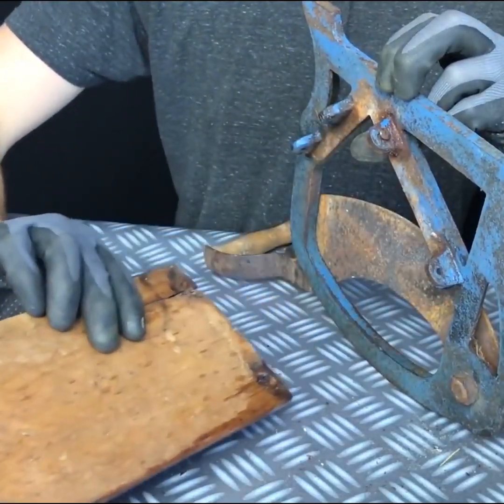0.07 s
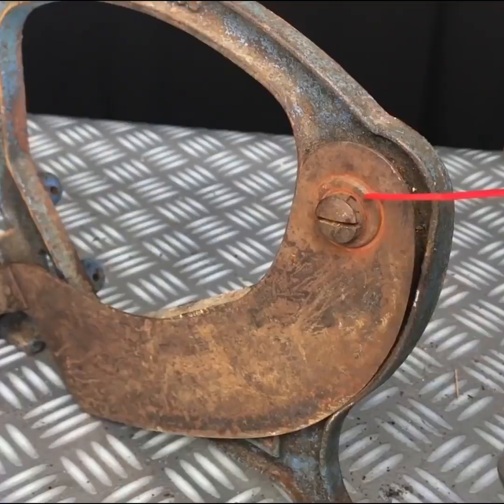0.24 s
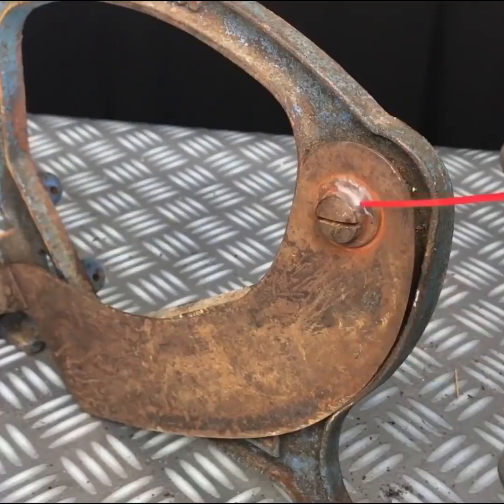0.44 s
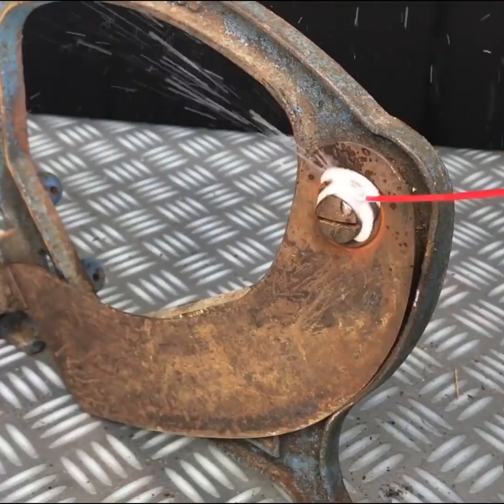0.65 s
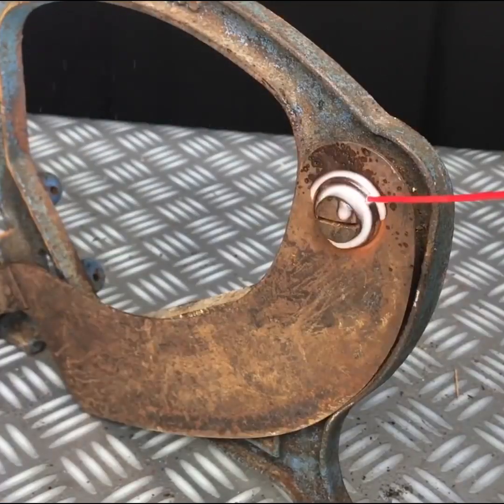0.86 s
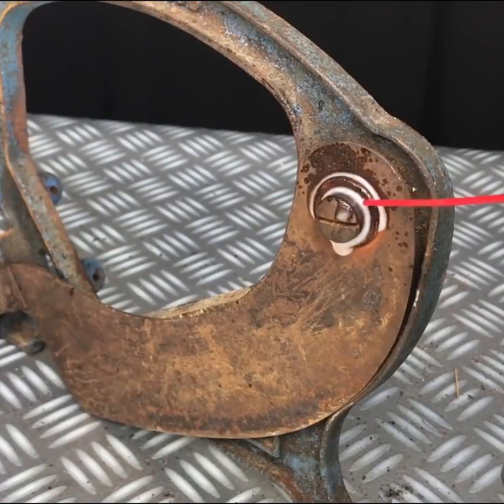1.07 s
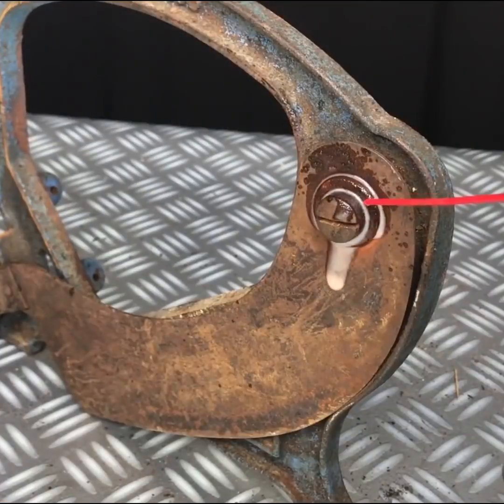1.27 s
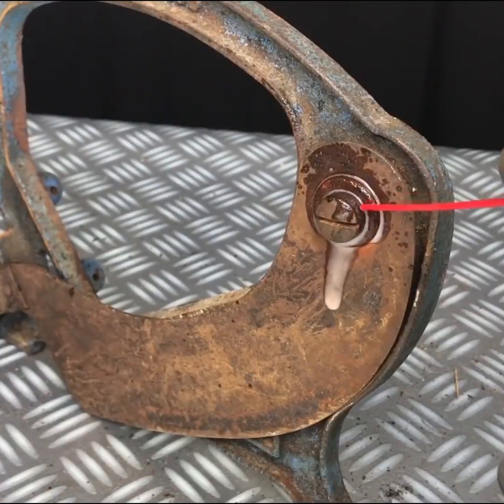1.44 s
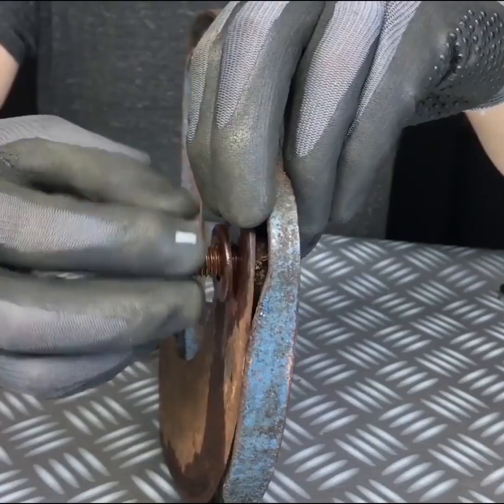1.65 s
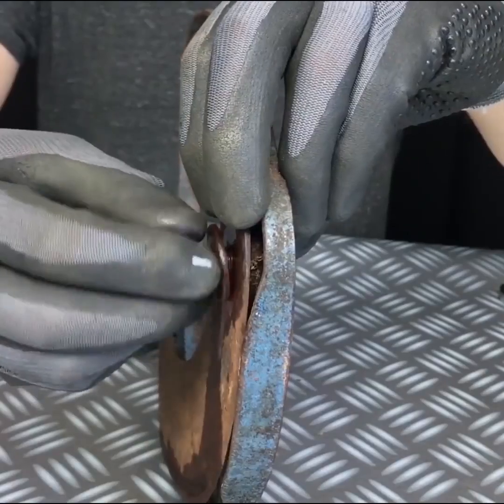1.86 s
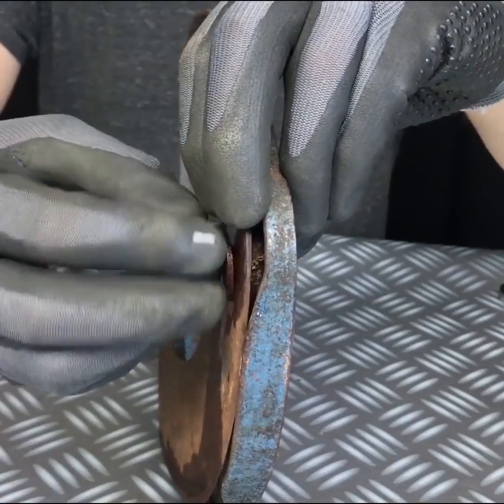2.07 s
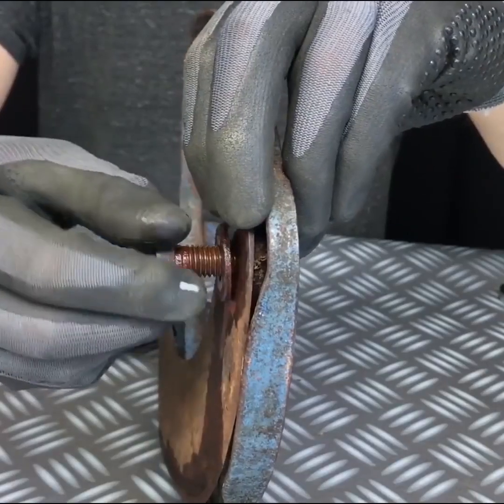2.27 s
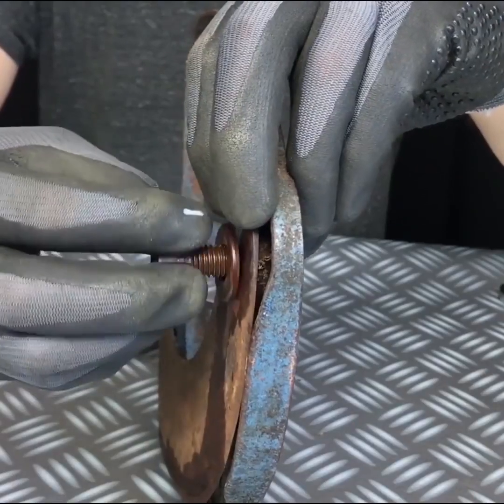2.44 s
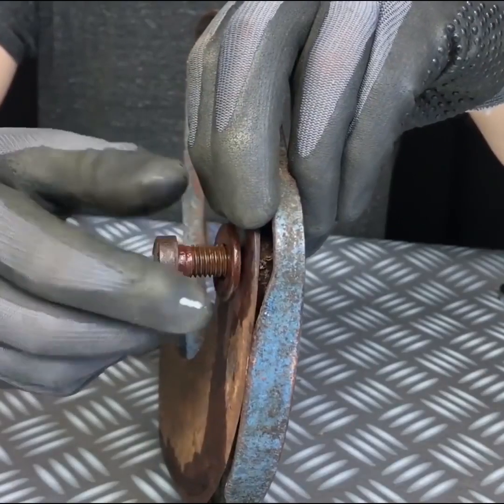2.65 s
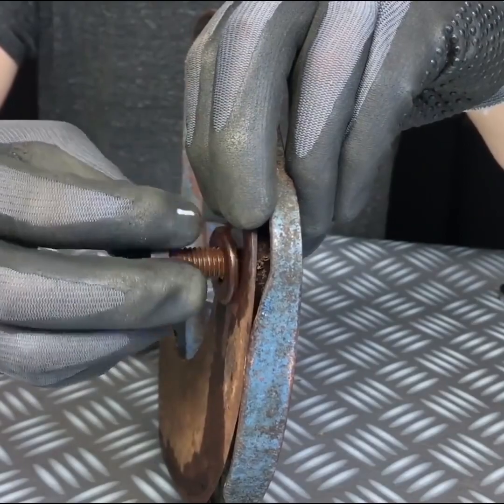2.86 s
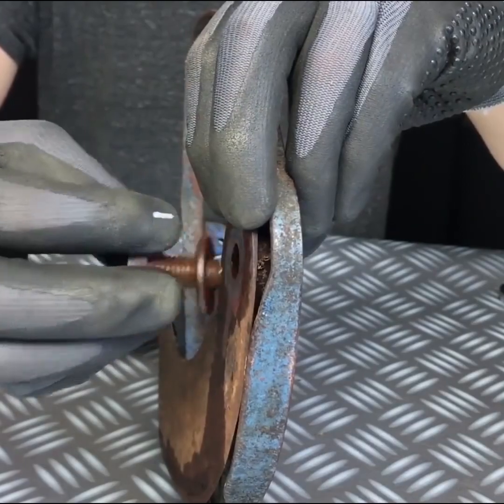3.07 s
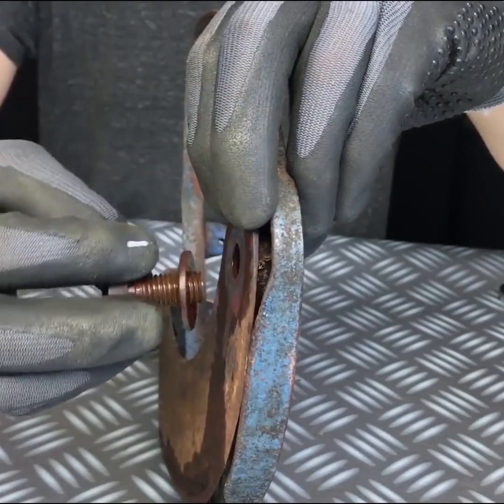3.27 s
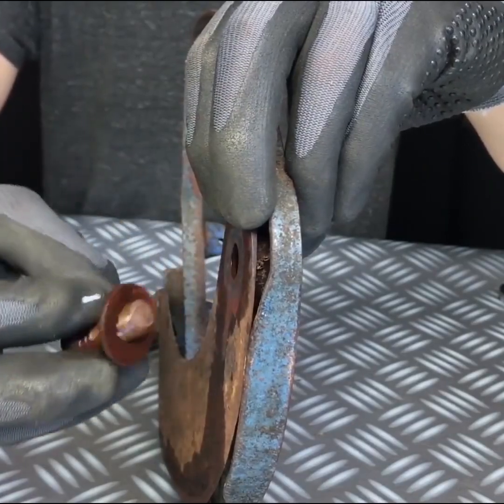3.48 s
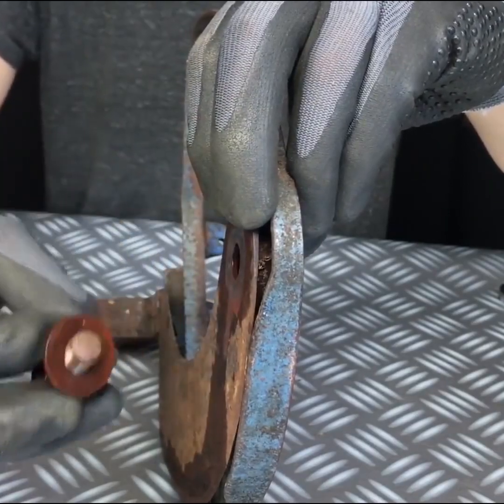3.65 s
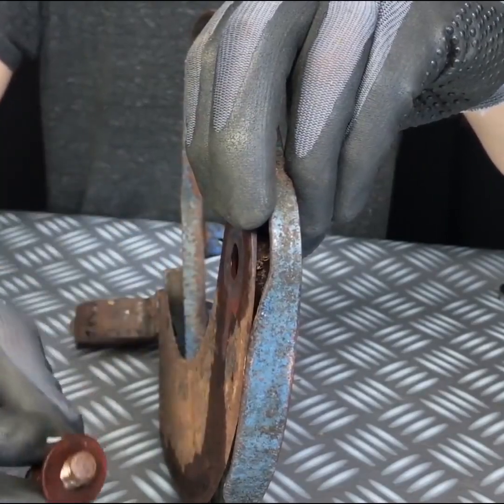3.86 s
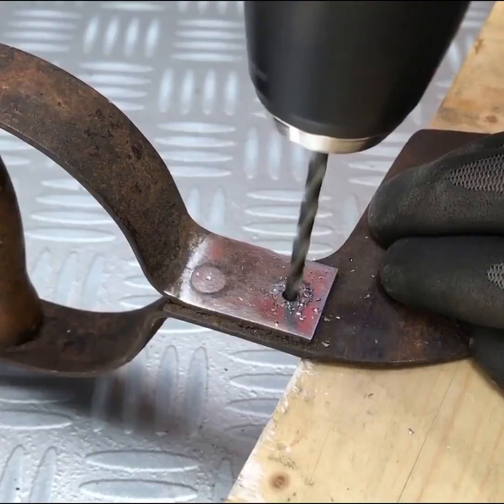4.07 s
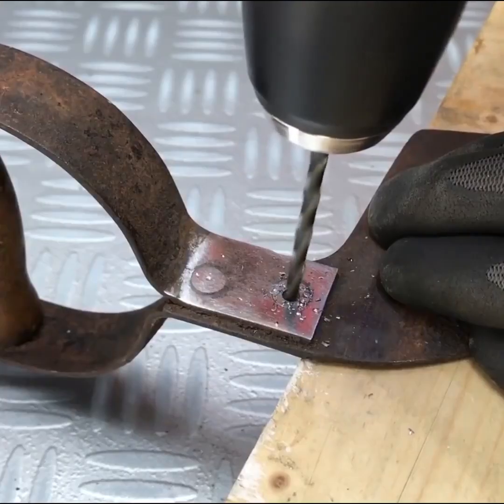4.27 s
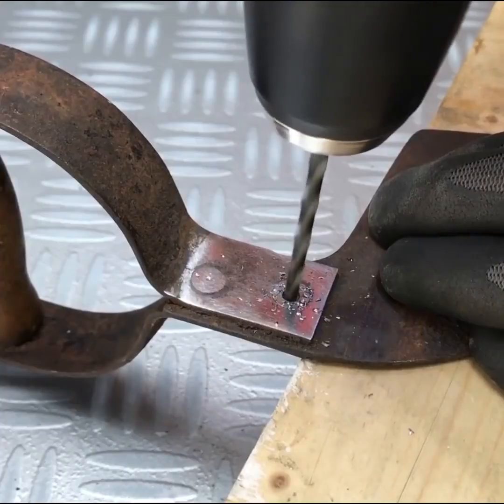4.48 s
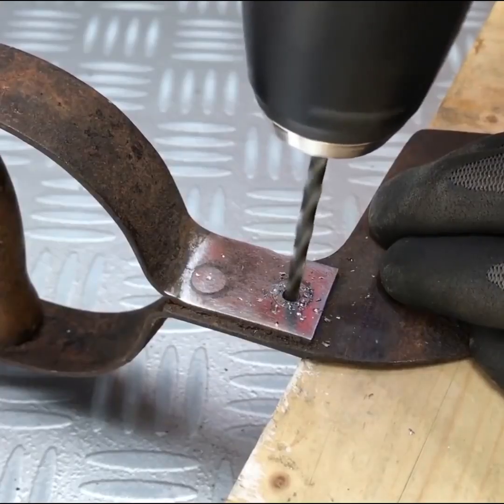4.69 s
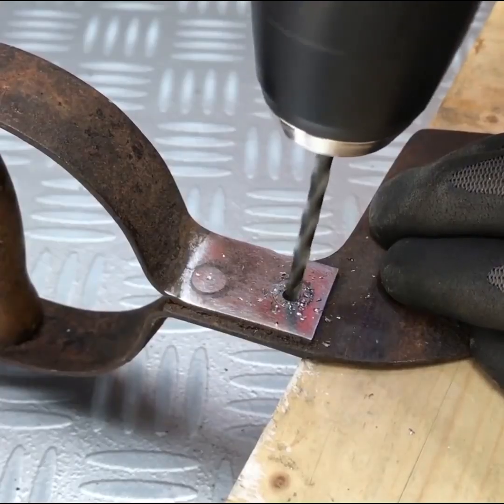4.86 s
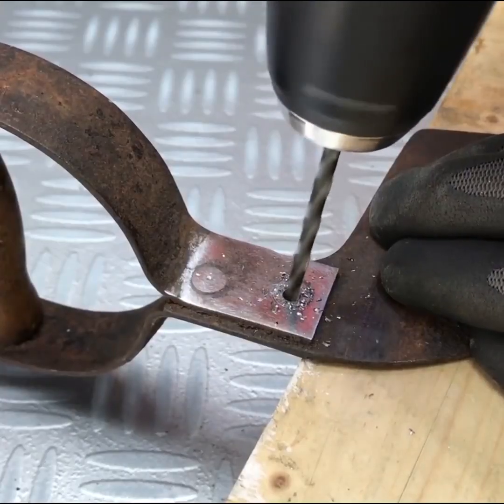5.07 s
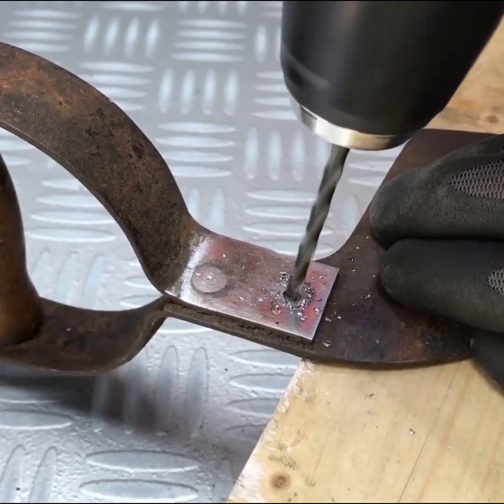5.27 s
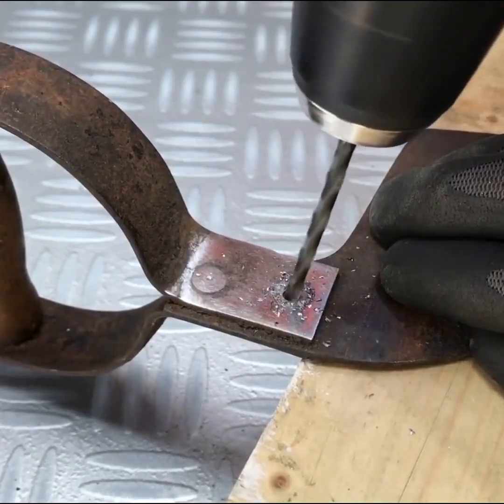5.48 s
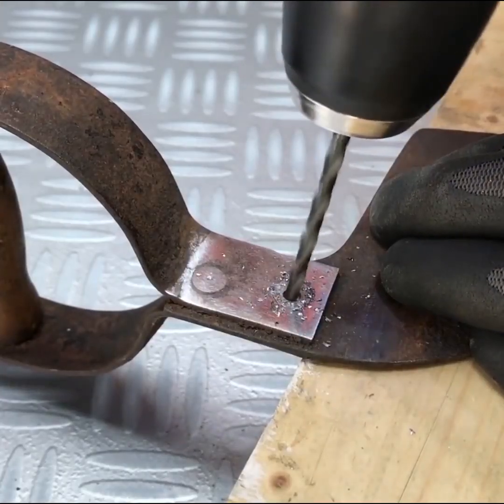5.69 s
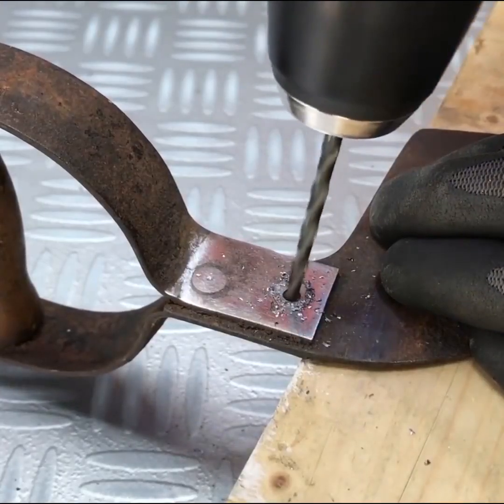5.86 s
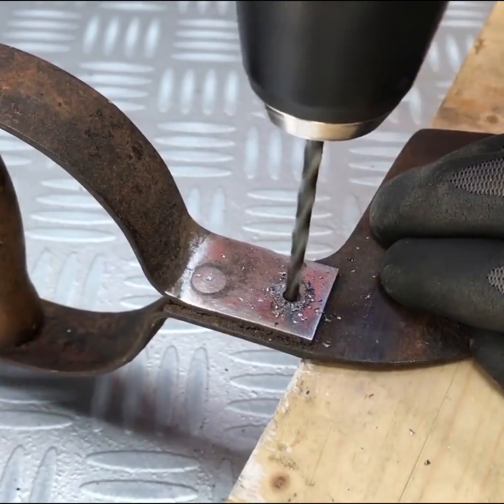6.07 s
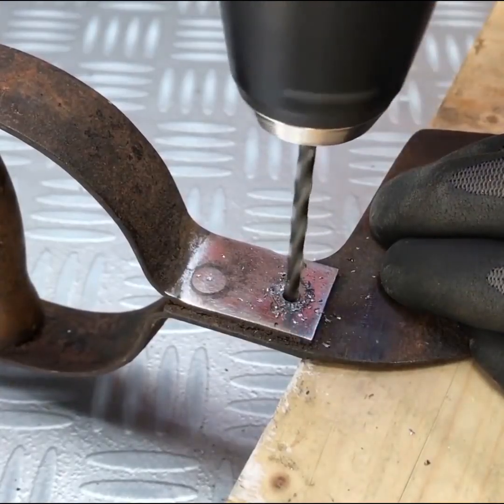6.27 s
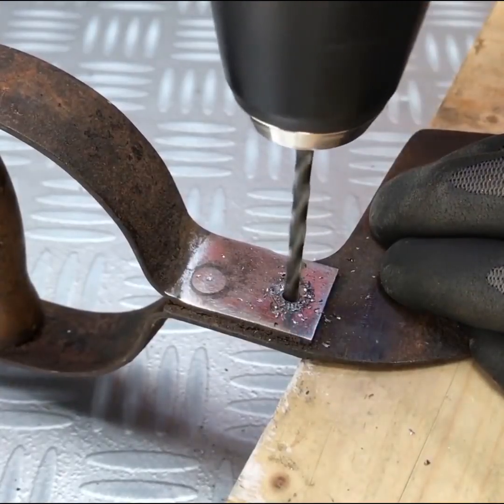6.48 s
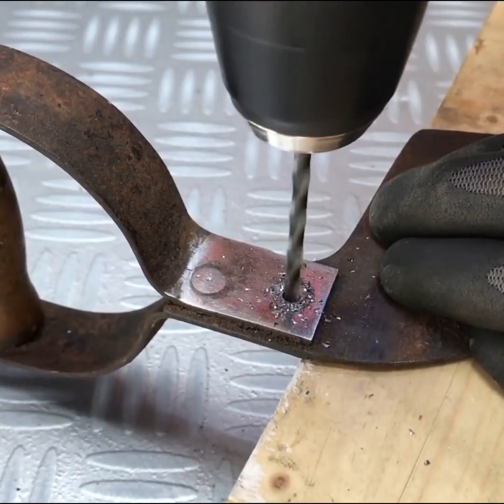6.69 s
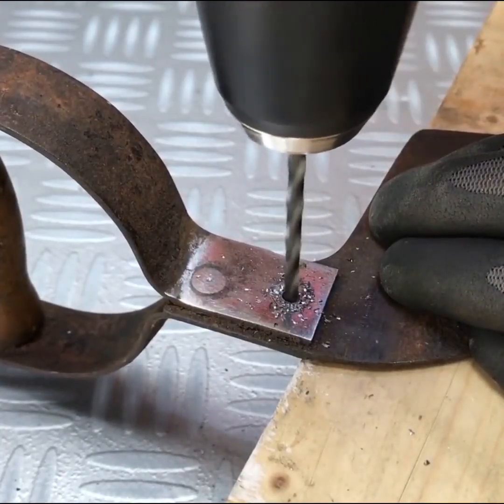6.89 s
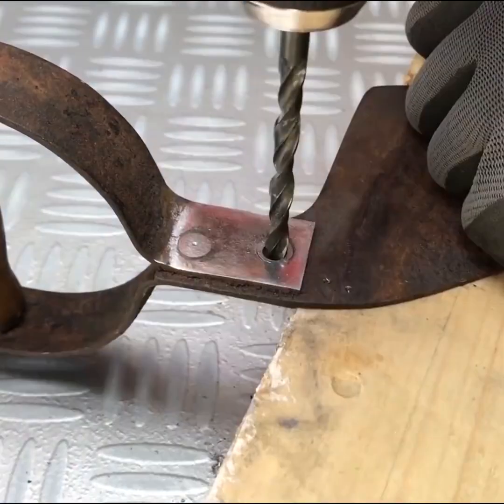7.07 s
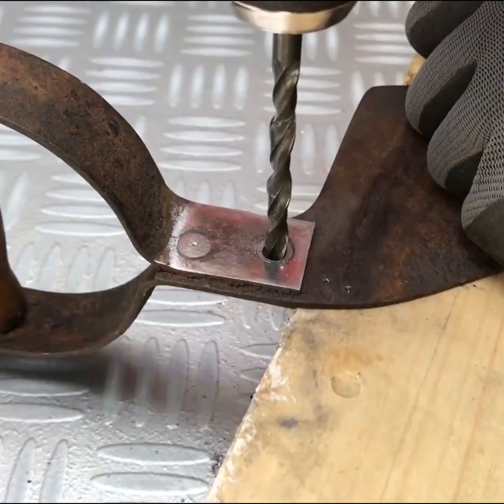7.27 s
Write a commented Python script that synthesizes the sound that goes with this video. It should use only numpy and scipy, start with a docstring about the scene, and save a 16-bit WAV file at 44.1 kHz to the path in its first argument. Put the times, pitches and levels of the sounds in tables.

```python
"""A tread-plate bench in a workshop, close up: work on a rusty iron tool, alike in both channels.
An aerosol can spits penetrating oil (combed droplet noise); gloved fingers twist a loose screw out
(shaped noise for thuds and grating, damped modes for the clinks in its hole).
A cordless drill bores the steel: tones locked to the motor, hiss, judder, squeaks and bench rumble;
it is cut in and out abruptly. Glove scuffs follow, over a quiet room tone."""
import sys
import numpy as np
from scipy import signal
from scipy.fft import rfft, irfft, next_fast_len
from scipy.io import wavfile
from scipy.ndimage import map_coordinates

SR = 44100
rng = np.random.default_rng(int(sys.argv[2]) if len(sys.argv) > 2 else 0)


def materialize(psi):
    """Save the field psi as 16-bit PCM at rate SR to the path in sys.argv[1].

    A 1-D psi becomes a single channel; in a 2-D psi each row is a channel.
    """
    bounded = np.clip(np.atleast_2d(psi).T, -1, 1)
    quanta = np.round(bounded * 32767).astype(np.int16)
    wavfile.write(sys.argv[1], SR, quanta)


N = 323253

# "Relative" levels get a further trim in the source's function.
# Colours of noise. Each row: frequency in Hz, relative density in dB per Hz.
ROOM_TONE_COLOUR = [(15, -33.5), (25, -13.5), (59, -0.5), (116, -15.5), (152, -6.5), (199, -10.5),
                    (221, -13.5), (341, -16.5), (379, -22), (539, -22.5), (1110, -26.5), (1240, -28),
                    (7340, -36), (15600, -36)]
JET_COLOUR = [(300, -29), (550, -24.5), (800, -20.5), (1250, -14), (1850, -12.5), (2600, -5.5), (4500, -10),
              (5500, -9.5), (6100, -2.5), (6800, -5.5), (9000, -4), (12800, -6.5), (14800, -2), (15700, -4)]
THUD_COLOUR = [(15, -43), (25, -14.5), (86, 6.5), (124, -0.5), (156, -7), (193, -1), (263, -19.5),
               (352, -2.5), (400, -15.5), (520, -38), (880, -120)]
KNOCK_COLOUR = [(150, -43), (250, -11), (316, -7), (352, 1.5), (386, -4.5), (615, -11), (670, -7),
                (747, -17), (814, -13), (1190, -30), (1500, -20), (1600, -21), (2080, -47.5), (3520, -120)]
SCRAPE_COLOUR = [(530, -32), (900, -7), (2000, -8.5), (2200, -4.5), (2540, -6.5), (2790, -6), (3630, -8.5),
                 (3990, -7), (4390, -10.5), (4770, -11), (15500, -23.5)]
CRACK_COLOUR = [(290, -44), (500, -19.5), (1880, -17), (3010, -13.5), (3850, -6.5), (4980, -6),
                (6640, -7.5), (9110, -10.5), (11100, -10.5), (12900, -14.5), (14400, -10.5), (15500, -25)]
WHIRR_COLOUR = [(300, -28), (600, -7.5), (1200, -0.5), (2300, 0.5), (3000, -0.5), (3500, 1.5), (3900, -3.5),
                (4800, -0.5), (6100, -0.5), (6900, -2.5), (8300, -5.5), (11000, -3.5), (13700, -2),
                (15600, -4.5)]
SHAKE_COLOUR = [(15, -40), (25, -16.5), (59, 5.5), (118, 2.5), (271, -3.5), (303, -9), (395, -14),
                (530, -22.5), (600, -28.5), (700, -19.5), (910, -60), (1540, -120)]

# Room tone. Each row: time in s, level in dB.
FLOOR = [(0, -66), (1.6, -68), (3.8, -67.5), (7.33, -70.5)]
# Soft drone that comes and goes. Each row: start in s, end in s, level in dB.
DRONE = [(.25, 1.75, -67), (7.0, 7.6, -70)]
# Room tail. Each row: frequency in Hz, t60 in s.
ROOM_T60 = [(200, .35), (2000, .36), (7000, 0.26), (15000, 0.2)]
TOP_HZ = 15780

# Glove shifting on the workpiece. Each row: peak in s, centre in Hz, width in Hz, level in dB, half length in s.
SCUFFS = [(7.106, 9000, 14000, -67.5, 0.0096), (7.142, 5940, 5900, -70, 0.013),
          (7.163, 1700, 500, -71, 0.016), (7.207, 3000, 6000, -69, 0.005), (7.268, 5000, 7000, -76, 0.0052),
          (7.325, 2750, 200, -76, .012)]
# Oil jet. Each row: time in s, level in dB.
JET = [(0.535, -30), (0.543, -39), (0.551, -41), (0.619, -30.5), (0.885, -33), (0.915, -45.5)]

# Frame bumping the bench. Each row: start in s, relative level in dB.
BUMPS = [(1.639, -40), (1.91, -39.5), (2.056, -43), (2.342, -38), (2.504, -33), (2.715, -44), (2.938, -44),
         (3.05, -35.5), (7.287, -54)]
# Bench modes. Each row: frequency in Hz, level in dB, t60 in s.
BENCH_MODES = [(86.5, -10.5, 0.12), (136, -11, 0.086), (193, -11.5, 0.11), (355, -5, 0.16),
               (450, -3.5, 0.068), (560, -4, 0.062), (798, -13, 0.046)]
# Steel modes. Each row: frequency in Hz, level in dB (clinks only), t60 in s.
STEEL_MODES = [(1520, -26, .13), (2180, -24, .1), (2750, -14, .19), (3128, -15, .15), (3460, -16, .1),
               (3770, -8, .1), (4058, -6, .18), (4650, -7, .05), (5300, -7, .06), (5920, -7, .05),
               (6475, -4, .06), (6780, 2, .035), (7180, -3, .05), (7843, -5, .05), (9650, -8, .05),
               (10260, -9, .045), (11440, 1, .05)]
WASHER_HZ = 14060
# Screw and washer touching the frame. Each row: start in s, level in dB, relative washer ring in dB,
# relative frame ring in dB, low-pass cut-off of the contact in Hz.
CLINKS = [(1.6407, -40, -30, 0, 15000), (1.911, -45.5, -40, -10, 1000), (1.977, -33.5, -40, -2, 11000),
          (1.9985, -30, -32, -1, 14000), (2.0413, -38.5, -10, -4, 13000), (2.0558, -36.5, -2, -2, 15000),
          (2.344, -37, -40, -8, 2000), (2.4225, -27, -25, -7.5, 10000), (2.492, -41.5, -25, -8, 15000),
          (2.5717, -18.5, -9, -3, 18000), (2.714, -23, -16, -5.5, 14000), (2.8944, -34.5, -20, -9, 11000),
          (2.9707, -26.5, -26, -8, 10000), (3.049, -22, -40, 0, 2200), (3.0945, -21.5, -8, -5, 14000),
          (3.597, -54, 7, -10, 14000)]
# Crack t60 at the hard level; it doubles for each such drop in level.
CRACK_T60_S, HARD_DB, CRACK_DOUBLES_DB = .036, -22, 16

# Fingers twisting the screw. Each row: peak in s, time to rise 20 dB in s, relative bench thud in dB,
# relative frame knock in dB, relative thread scrape in dB.
TWISTS = [(1.652, .02, -48, -49, -54), (1.79, .06, -57, -58.5, -71), (2.055, .08, -43.5, -51.5, -55),
          (2.252, .06, -82, -88, -66), (2.348, .016, -51, -52, -71), (2.52, .11, -45.5, -49, -53),
          (2.59, .05, -55, -60, -75), (2.9, .03, -63, -63, -57.5), (2.955, .13, -47, -54.5, -55.5),
          (3.054, .05, -55, -50, -58), (3.17, .04, -60, -76, -61.5), (3.228, .05, -85, -90, -71)]
THUD_FALL_S, KNOCK_FALL_S, SCRAPE_FALL_S = .13, .1, .14  # time for 20 dB
SCRAPE_RISE_SHARE = .6  # the thread breaks loose late in the twist
GRIP_RELATIVE_DB = -73  # thudding of the gloves between twists

DRILL_ON_S, DRILL_OFF_S = 3.978, 7.102
# Motor speed. Each row: time in s, turns per second.
SPEED = [(3.98, 302.7), (4.42, 303), (4.8, 304.9), (4.98, 305), (5.14, 302.8), (5.38, 302.3), (5.55, 303.2),
         (5.81, 302.6), (6.02, 304.8), (7.1, 305.2)]
GEAR_RATIO = 19.3  # motor turns per turn of the bit
# Motor and gear tones. Each row: multiple of the motor speed, relative level in dB running light,
# dB added under full load.
ORDERS = [(1, -61, 0), (2, -62.5, -2), (2.19, -74, 0), (3, -73, 3), (4, -67, -5), (6.87, -63, -4),
          (9, -75, 8), (10.26, -73, 0), (11.39, -69, 1), (11.55, -68, 2), (12, -61, 2), (13.89, -68, 1),
          (15, -60, -5), (18, -59, -2), (19, -66, -1), (19.85, -68, -2), (20.53, -67, 1), (21, -64, 1),
          (22, -73, 4), (23, -72, 0), (24, -62, 2), (25, -67, -3), (27, -75, 7)]
SWITCH_HZ = 6585
# Speed controller's sidebands. Each row: multiple of the motor speed above the switching frequency,
# relative level in dB running light, dB added under full load.
SIDEBANDS = [(15, -67, -3), (18, -67, -4), (21, -69, -1), (24, -68, 0), (27, -69, 1), (28, -72, 0)]
HUM_FULL_S, HUM_GROWS_DB_PER_S = 5.6, 4.5  # the low hum builds up until then

CUT_DB, CUT_EASES_DB_PER_S = -44.7, .5  # hiss eases as the hole deepens
# Housing and bit resonances. Each row: frequency in Hz, width in Hz, dB relative to the cutting level.
HOUSING = [(2098, 170, -18), (4214, 260, -15.5), (5980, 450, -14), (13650, 870, -13.5)]

# Judder rates, as multiples of the motor speed.
CHATTER_ORDERS = [4.53, 4.68]
CHATTER_DB, CHATTER_LOAD_DB = -67, 7  # running light; added under full load
BIND_S, BIND_HALF_S, BIND_DB = 5.73, .13, 7  # the bit binds once and judders harder

# Rough cutting that shakes the bench. Each row: start in s, end in s, relative level in dB.
ROUGH_CUTS = [(3.94, 4.53, -49.5), (4.49, 4.8, -53), (4.76, 5.0, -49), (4.96, 5.42, -54),
              (6.68, 7.13, -53.5)]
SMOOTH_CUT_RELATIVE_DB = -61.5  # shaking between the spells
# Bit catching and jolting the bench. Each row: peak in s, relative level in dB.
JOLTS = [(3.995, -42), (4.335, -46), (4.44, -43), (4.645, -41), (4.91, -44), (5.225, -44.5), (5.268, -46),
         (5.326, -44), (5.51, -46), (6.06, -50), (6.24, -46), (6.33, -53), (6.404, -47), (6.482, -52),
         (6.532, -48), (6.74, -49), (6.818, -45), (6.866, -42.5), (6.942, -48), (7.072, -47)]
JOLT_RISE_S, JOLT_FALL_S, JOLT_DULL_HZ = .012, .06, 260  # times for 20 dB; duller than the rumble

# Cutting edge sticking. Each row: peak in s, frequency in Hz, level in dB, half length in s.
SQUEAKS = [(4.093, 4120, -44.5, 0.0081), (4.866, 4320, -44.5, .008), (5.558, 4260, -51, .009),
           (6.174, 4250, -44.5, 0.0081), (6.428, 4320, -51, .008)]
# Swarf curl rasping in the flute. Each row: start in s, end in s, relative level in dB.
RASPS = [(4.26, 4.62, -50), (4.79, 5.01, -51), (6.04, 6.26, -53)]


def amp(db):
    """Decibels to gain."""
    return 10 ** (np.asarray(db) / 20)


def unit(x):
    """Scale to rms 1."""
    return x / np.sqrt(np.mean(x ** 2) + 1e-20)


def clock():
    """Time of every sample, s."""
    return np.arange(N) / SR


def along(points, hz):
    """(Hz, value) points read on a log axis."""
    f, v = np.transpose(points)
    return np.interp(np.log(hz + 1), np.log(f + 1), v)


def curves(rows):
    """One value per sample for each column after the time."""
    s, *cols = np.transpose(rows)
    return [np.interp(clock(), s, c) for c in cols]


def gate(start_s, stop_s, edge_s):
    """One between two times, with straight edges."""
    return np.clip((clock() - start_s) / edge_s, 0, 1) * np.clip((stop_s - clock()) / edge_s, 0, 1)


def swell(peak_s, half_s):
    """Gaussian bump in time."""
    return np.exp(-.5 * ((clock() - peak_s) / half_s) ** 2)


def stroke(peak_s, rise_s, fall_s):
    """Exponential peak; rise and fall are the times for 20 dB."""
    t = clock() - peak_s
    return amp(-20 * np.maximum(-t / rise_s, t / fall_s))


def spells(rows, edge_s):
    """Gain of (start, end, dB) stretches with straight edges."""
    return sum(amp(db) * gate(start, stop, edge_s) for start, stop, db in rows)


def wobble(rate_hz):
    """Smooth random curve, rate_hz knots a second."""
    knots = rng.standard_normal(int(N * rate_hz / SR) + 4)
    return map_coordinates(knots, [clock() * rate_hz])


def filtered(x, response):
    """x through a response of frequency."""
    m = next_fast_len(len(x) + 8192)
    return irfft(rfft(x, m) * response(np.fft.rfftfreq(m, 1 / SR)), m)[:len(x)]


def coloured(x, spectrum):
    """x with a (Hz, dB) colour, at rms 1."""
    return unit(filtered(x, lambda f: amp(along(spectrum, f))))


def hiss():
    """White noise."""
    return rng.standard_normal(N)


def narrow(hz, width_hz):
    """Noise in one steep resonance, at rms 1."""
    def response(f):
        damping = 1j * f * width_hz
        return (damping / (hz * hz - f * f + damping)) ** 2
    return unit(filtered(hiss(), response))


def grains(rate_hz, spread_db):
    """Random tiny impacts of uneven size, at rms 1."""
    hits = rng.random(N) < rate_hz / SR
    return unit(hits * np.sign(hiss()) * amp(spread_db * np.clip(hiss(), -2, 2)))


def ring(modes, t, scatter_db):
    """Damped modes, with random sign and scattered strength each call."""
    out = 0
    for hz, db, t60 in modes:
        level = amp(db + scatter_db * rng.normal() - 60 * t / t60)
        out = out + level * np.sin(2 * np.pi * hz * t) * rng.choice([-1, 1])
    return out


def add(track, s, sound):
    """Mix a sound in at a time."""
    part = track[round(s * SR):][:len(sound)]
    part += sound[:len(part)]


def room_tone():
    """Low rumble and faint hiss as coloured noise, plus a soft narrow-band drone."""
    floor = amp(curves(FLOOR)[0] + .8 * wobble(5.3)) * coloured(hiss(), ROOM_TONE_COLOUR)
    return floor + spells(DRONE, edge_s=.25) * narrow(163.7, 45)


def room(x):
    """The workshop's short tail: decaying noise after 5 ms, treble dying first."""
    hz, t, z = signal.stft(rng.standard_normal(SR // 2), SR, nperseg=256)
    decay = amp(-60 * t / along(ROOM_T60, hz)[:, None])
    tail = signal.istft(z * decay, SR, nperseg=256)[1]
    response = np.pad(tail / np.linalg.norm(tail), (SR // 200, 0))
    return signal.fftconvolve(x, response)[:N]


def scuffs():
    """Soft rubs of the glove once the drill is still: bumps of unsteady band noise."""
    rubs = sum(amp(db) * swell(s, half) * narrow(hz, width) for s, hz, width, db, half in SCUFFS)
    return amp(2.5 * wobble(150)) * rubs


def groan(groan_db=-61.5):
    """A low resonance sounds while the screw takes its first turn."""
    return amp(groan_db) * gate(1.77, 2.16, 0.028) * narrow(192, 18)


def bumps(trim_db=-10, attack_s=0.0017):
    """Dull knocks of the frame excite the damped modes of the bench."""
    out, t = np.zeros(N), clock()[:SR // 2]
    for s, db in BUMPS:
        knock = ring(BENCH_MODES, t, scatter_db=2) * (1 - np.exp(-t / attack_s))
        add(out, s, amp(db + trim_db) * knock)
    return out


def spray(echo_s=0.000802, echo_share=0.35):
    """Droplets burst from the nozzle; the nearby steel reflects the hiss and combs it."""
    drops = grains(rate_hz=3200, spread_db=2.5) + 0.64 * hiss()
    combed = filtered(drops, lambda f: 1 + echo_share * np.exp(-f / 16000 - 2j * np.pi * f * echo_s))
    sputter = amp(0.51 * wobble(130))
    level = amp(curves(JET)[0]) * gate(0.5342, .918, 0.0057)
    return level * sputter * coloured(combed, JET_COLOUR)


def handling(thud_trim_db=-2, knock_trim_db=-3, scrape_trim_db=-0.7, sing_trim_db=-8):
    """Gloves jostle the frame on the bench while the rusty thread grates and makes the steel sing."""
    thud = amp(GRIP_RELATIVE_DB) + sum(amp(db) * stroke(s, rise, THUD_FALL_S) for s, rise, db, _, _ in TWISTS)
    knock = sum(amp(db) * stroke(s, rise, KNOCK_FALL_S) for s, rise, _, db, _ in TWISTS)
    scrape = sum(amp(db) * stroke(s, rise * SCRAPE_RISE_SHARE, SCRAPE_FALL_S)
                 for s, rise, _, _, db in TWISTS)
    grit = (grains(rate_hz=1200, spread_db=3) + .8 * hiss()) * amp(2.6 * wobble(120))
    # scraped steel: same modes, levels falling 1 dB per 800 Hz
    scraped_modes = [(hz, -hz / 800, t60) for hz, _, t60 in STEEL_MODES]
    steel_response = ring(scraped_modes, clock()[:SR // 3], scatter_db=3)
    singing = unit(signal.fftconvolve(grit, steel_response)[:N])
    grating = amp(scrape_trim_db) * coloured(grit, SCRAPE_COLOUR) + amp(sing_trim_db) * singing
    body = amp(thud_trim_db) * thud * coloured(hiss(), THUD_COLOUR)
    body += amp(knock_trim_db) * knock * coloured(grit, KNOCK_COLOUR)
    return gate(1.636, 3.4, 0.005) * (body + scrape * grating)


def clinks(ring_trim_db=-13, crack_db=-9, washer_trim_db=-9, washer_t60_s=0.13, attack_s=0.00096, rattle=0.48):
    """Each contact cracks, rings the frame and sets the small washer singing; loose parts rattle."""
    out, t = np.zeros(N), clock()[:SR // 2]

    def loose():
        return 1 + rattle * np.interp(t, np.arange(200) / 400, rng.standard_normal(200))

    for s, db, sing_db, frame_db, soft_hz in CLINKS:
        crack_t60_s = CRACK_T60_S * 2 ** ((HARD_DB - db) / CRACK_DOUBLES_DB)
        crack = coloured(rng.standard_normal(len(t)), CRACK_COLOUR) * amp(crack_db - 60 * t / crack_t60_s)
        steel = amp(ring_trim_db + frame_db) * ring(STEEL_MODES, t, scatter_db=2.5) * loose()
        b, a = signal.butter(2, min(soft_hz / SR, .49), fs=1)
        blow = signal.lfilter(b, a, crack + steel)
        washer = amp(sing_db + washer_trim_db - 60 * t / washer_t60_s)
        washer = washer * np.sin(2 * np.pi * WASHER_HZ * t) * loose()
        add(out, s, amp(db) * (blow + washer) * (1 - np.exp(-t / attack_s)))
    return out


def load():
    """Load on the drill, 0 to 1, read from the speed: the harder the bit bites, the slower the motor."""
    speed = curves(SPEED)[0]
    return (speed.max() - speed) / np.ptp(speed)


def bite(turns):
    """Swings between -1 and 1 once a turn of the bit."""
    return np.cos(2 * np.pi * turns / GEAR_RATIO)


def motor(turns, trim_db=-0.38, flutter_db=1.9, jitter_rad=0.25, buzz_relative_db=-76):
    """Commutator, gears and speed controller whine in step with the shaft; load shifts their balance."""
    running = slice(round(DRILL_ON_S * SR), round(DRILL_OFF_S * SR))
    t, turns, strain = clock()[running], turns[running], load()[running]
    hum_db = HUM_GROWS_DB_PER_S * np.minimum(t - HUM_FULL_S, 0)
    lines = [(k * turns, db + more * strain + hum_db * (k <= 2)) for k, db, more in ORDERS]
    lines += [(SWITCH_HZ * t + k * turns, db + more * strain) for k, db, more in SIDEBANDS]
    # the brushes add a faint buzz of high harmonics
    lines += [(k * turns, buzz_relative_db + 2 * rng.normal()) for k in range(29, 51)]
    knots = np.linspace(DRILL_ON_S, DRILL_OFF_S, 90)

    def waver():
        return np.interp(t, knots, rng.standard_normal(len(knots)))

    out = np.zeros(N)
    for cycles, db in lines:
        level = np.sqrt(2) * amp(db + trim_db + flutter_db * waver())
        out[running] += level * np.sin(2 * np.pi * cycles + jitter_rad * waver())
    return out


def cutting(turns, whirr_db=-2, pulse=0.057, sway=0.04):
    """Brushes and cutting edges hiss through the housing; the whirr pulses with motor and bit."""
    throb = 1 + pulse * np.cos(2 * np.pi * turns) + .12 * np.cos(6 * np.pi * turns)
    throb *= 1 + sway * bite(turns)
    noise = hiss() + 0.77 * grains(rate_hz=2200, spread_db=3)
    whirr = amp(whirr_db) * coloured(throb * noise, WHIRR_COLOUR)
    housing = sum(amp(db + 1.2 * wobble(12)) * narrow(hz, width) for hz, width, db in HOUSING)
    return amp(CUT_DB - CUT_EASES_DB_PER_S * (clock() - DRILL_ON_S)) * (whirr + housing)


def shaking(turns, shake_trim_db=-1, jolt_trim_db=-1, lurch_db=4, clatter_trim_db=-12,
            clatter_hz=345, clatter_width_hz=210, clatter_swing_db=7):
    """Rough cutting rumbles the bench and clatters the frame, lurching with the bit; catches thump."""
    rough = spells(ROUGH_CUTS, edge_s=.05)
    lurch = (bite(turns) + wobble(35)) / np.sqrt(2)
    strength = np.hypot(amp(SMOOTH_CUT_RELATIVE_DB), rough * unit(amp(lurch_db * lurch)))
    rumble = unit(coloured(hiss(), SHAKE_COLOUR) * amp(2 * wobble(60)))
    clatter_swing = amp(clatter_swing_db * np.clip(lurch, -2, 1.5))
    clatter = unit(narrow(clatter_hz, clatter_width_hz) * clatter_swing)
    jolts = sum(amp(db) * stroke(s, JOLT_RISE_S, JOLT_FALL_S) for s, db in JOLTS)
    dull = filtered(hiss(), lambda f: 1 / np.hypot(1, (f / JOLT_DULL_HZ) ** 2))
    thump = coloured(dull, SHAKE_COLOUR)
    out = amp(shake_trim_db) * strength * rumble
    out += amp(clatter_trim_db) * rough * clatter
    return out + amp(jolt_trim_db) * jolts * thump


def chatter(turns, flutter_db=4.5, noisy=0.6, overtone=0.55):
    """Judder at two close, beating rates, driven by load and bite; hitting the hole's wall adds an octave."""
    judder = sum(np.sin(2 * np.pi * k * turns + 0.27 * wobble(30)) for k in CHATTER_ORDERS)
    judder = unit(judder + noisy * narrow(1378, 120))
    octave = coloured(judder ** 2, [(1500, -60), (2400, 0)])  # squaring doubles the frequency
    bound = swell(BIND_S, BIND_HALF_S)
    level_db = CHATTER_DB + CHATTER_LOAD_DB * load() + BIND_DB * bound
    level_db += flutter_db * (1 - bound) * bite(turns)
    return amp(level_db) * (judder + overtone * octave)


def squeaks(turns, rasp_dip_db=7, rub_db=-58, rough_rad=0.71):
    """The bit grabs and squeaks; swarf rasps far higher once a turn; the flanks rub at the deepest bite."""
    unsteady = rough_rad * wobble(300)
    tones = 0
    for s, hz, db, half in SQUEAKS:
        tone = np.sqrt(2) * np.sin(2 * np.pi * hz * clock() + unsteady)
        tones = tones + amp(db) * swell(s, half) * tone
    rasp = amp(rasp_dip_db * (bite(turns) - 1) + 2 * wobble(16))
    swarf = narrow(10630, 1000) * spells(RASPS, edge_s=.02) * rasp
    rub = amp(rub_db) * swell(5.34, 0.17) * narrow(8900, 1016)
    return tones + swarf + rub


def drill():
    """All drill sounds share one shaft angle: the speed curve plus a slight random wander, integrated."""
    turns = np.cumsum(curves(SPEED)[0] + .06 * wobble(16)) / SR
    sound = motor(turns) + cutting(turns) + shaking(turns) + chatter(turns) + squeaks(turns)
    return gate(DRILL_ON_S, DRILL_OFF_S, 0.0016) * sound


def scene():
    """All sources, alike in both channels; only jet and clinks excite the room tail."""
    jet, steel = spray(), clinks()
    screw = steel + amp(-10) * room(steel) + handling() + groan() + bumps()
    mono = room_tone() + scuffs() + jet + amp(-15) * room(jet) + screw + drill()
    return np.array([mono, mono])


def record(dry):
    """Band limit: nothing passes at or above TOP_HZ."""
    return np.array([filtered(channel, lambda f: f < TOP_HZ) for channel in dry])


dry = scene()
out = record(dry)
materialize(out)
```